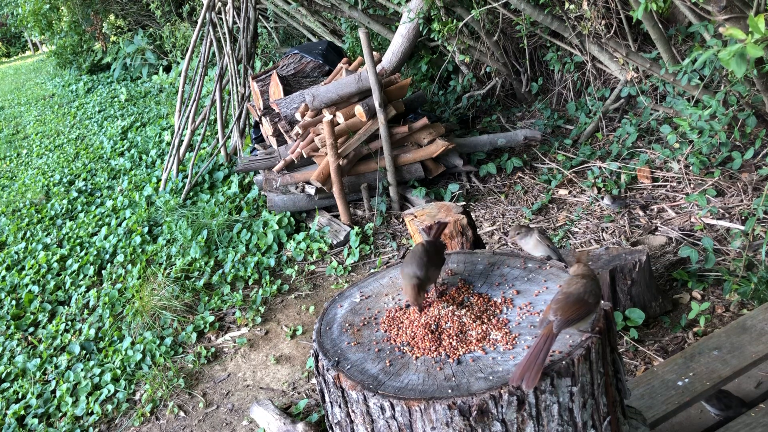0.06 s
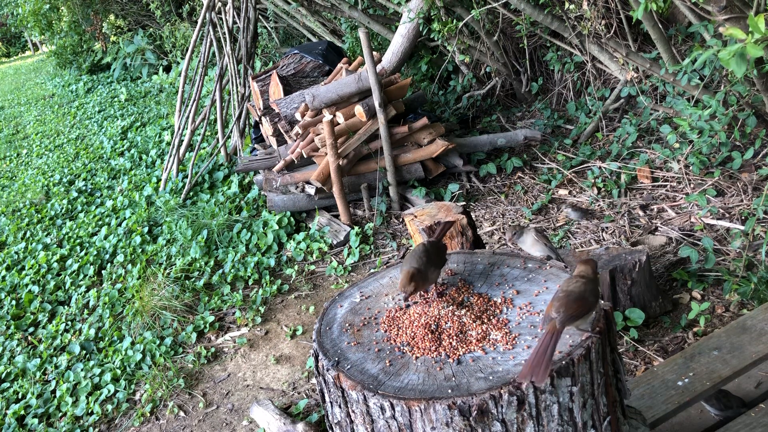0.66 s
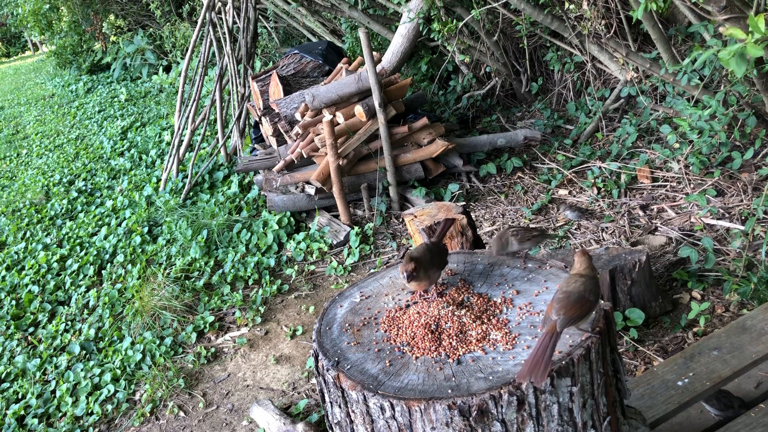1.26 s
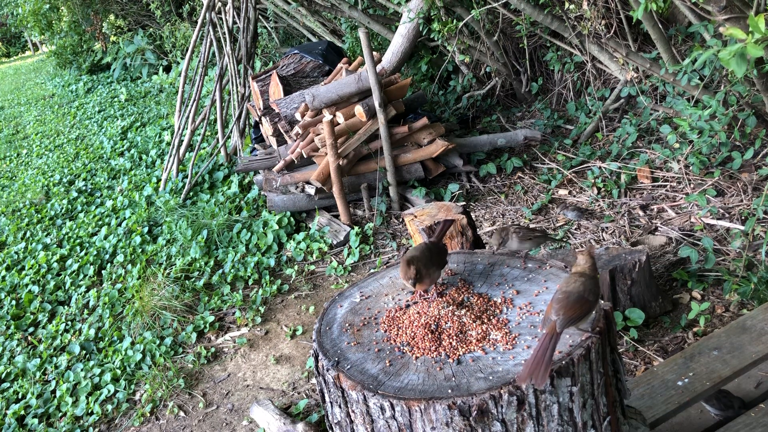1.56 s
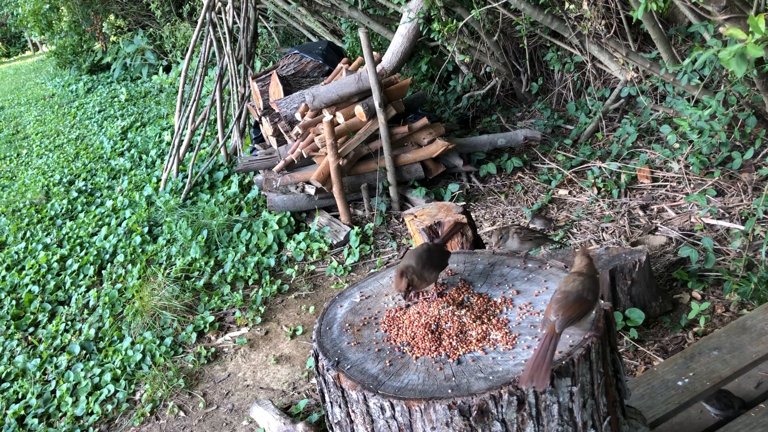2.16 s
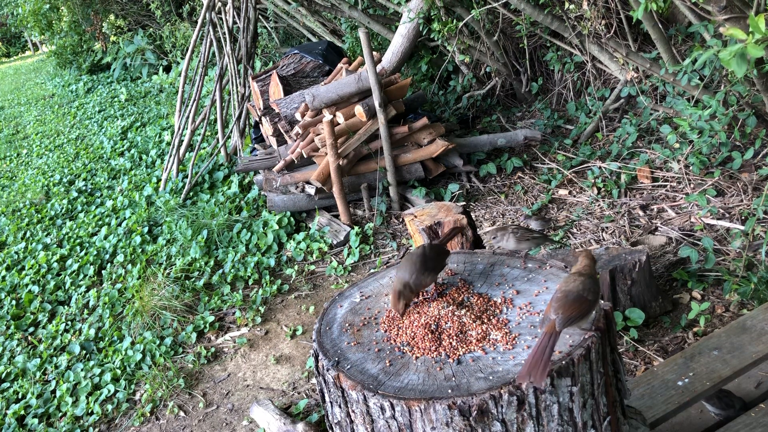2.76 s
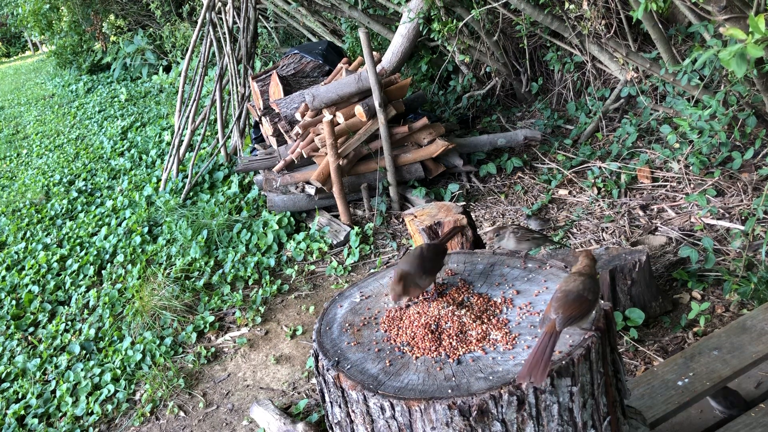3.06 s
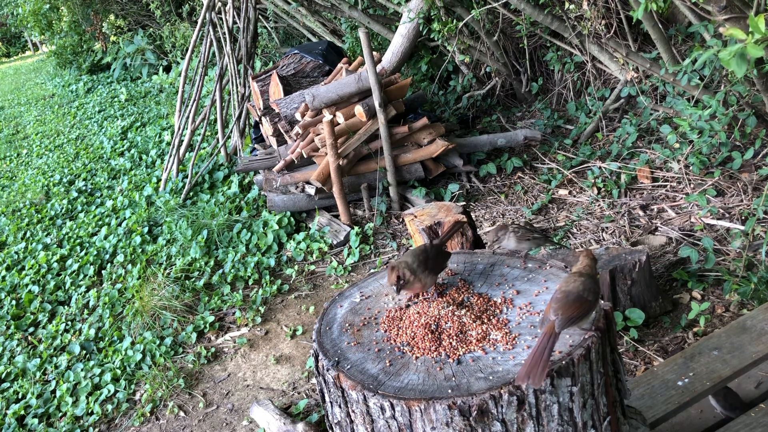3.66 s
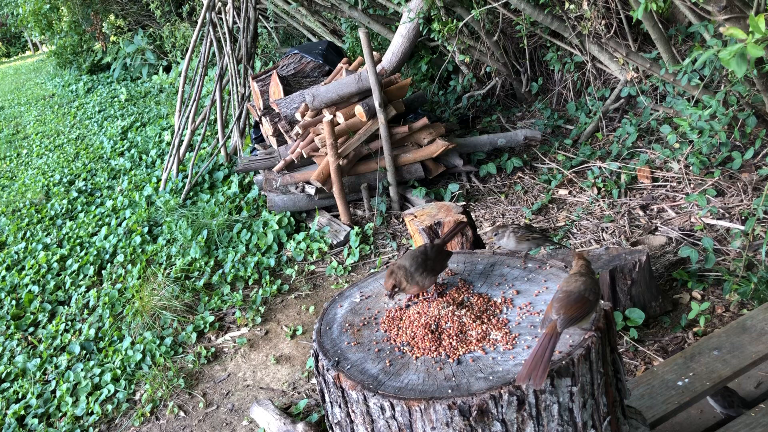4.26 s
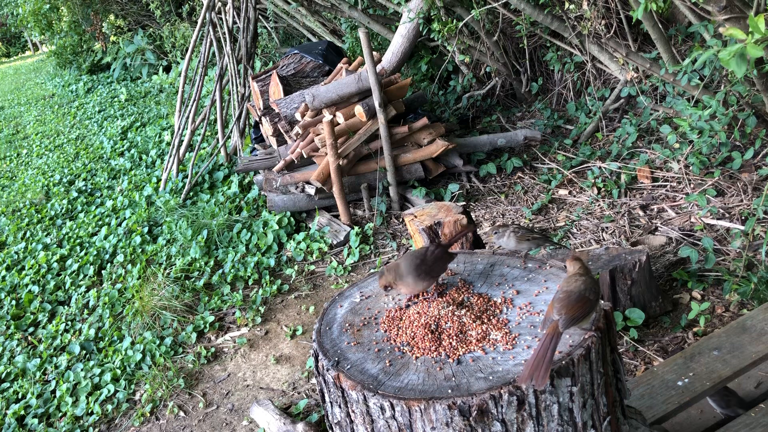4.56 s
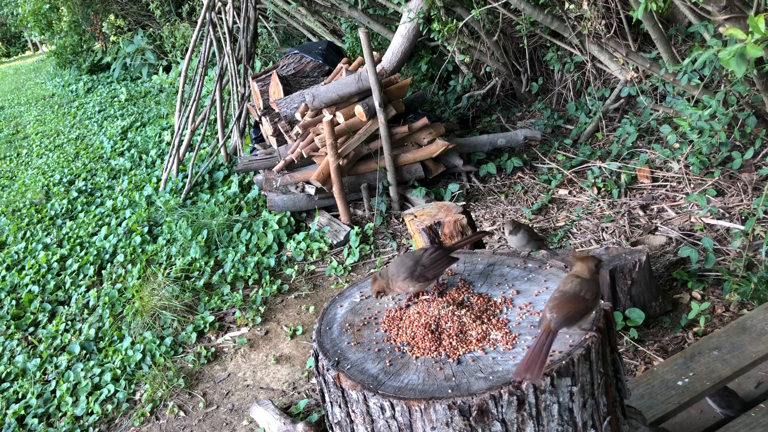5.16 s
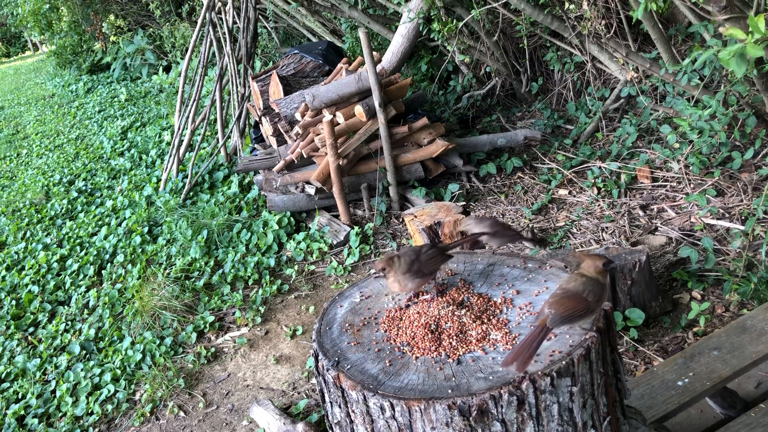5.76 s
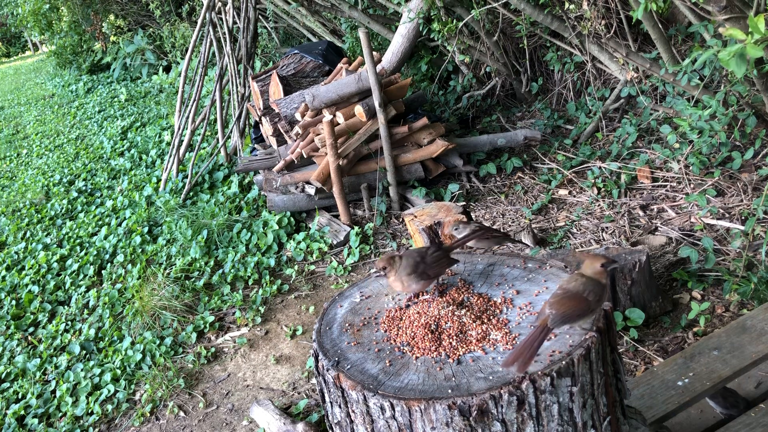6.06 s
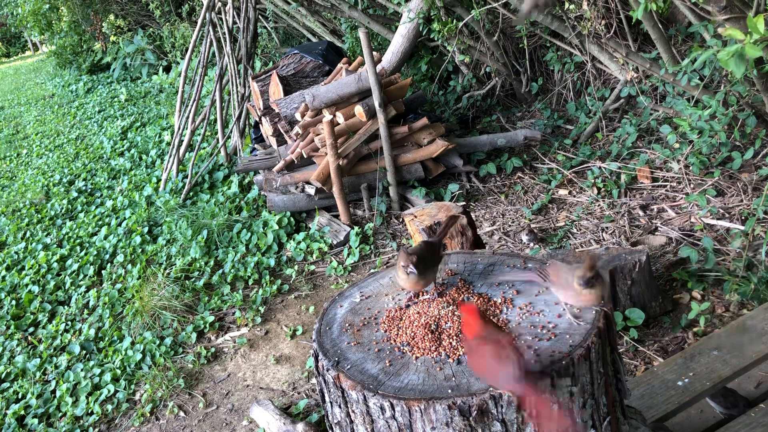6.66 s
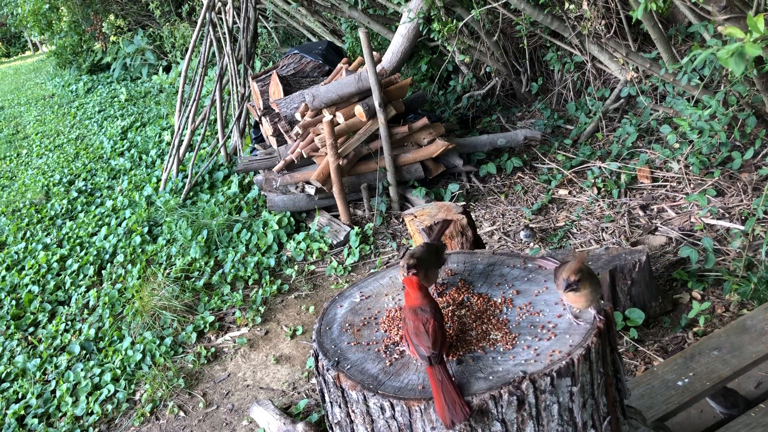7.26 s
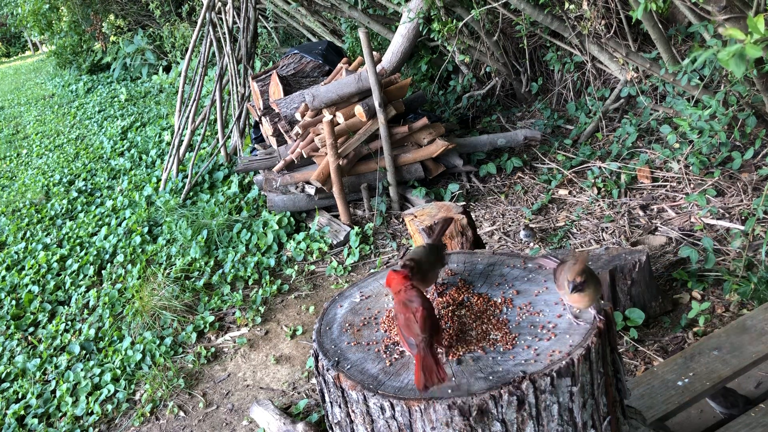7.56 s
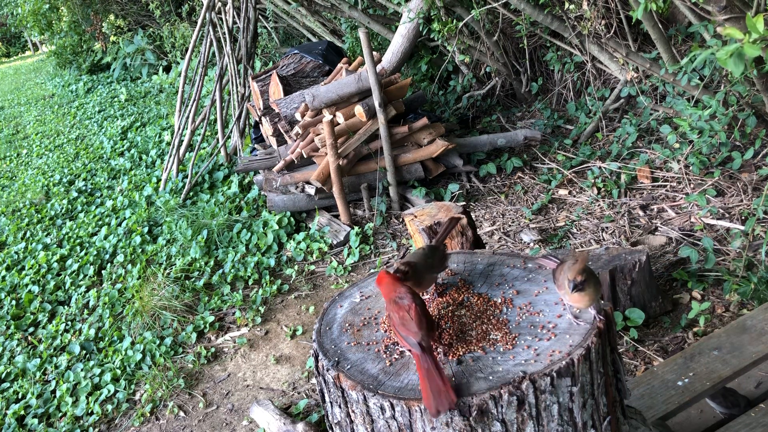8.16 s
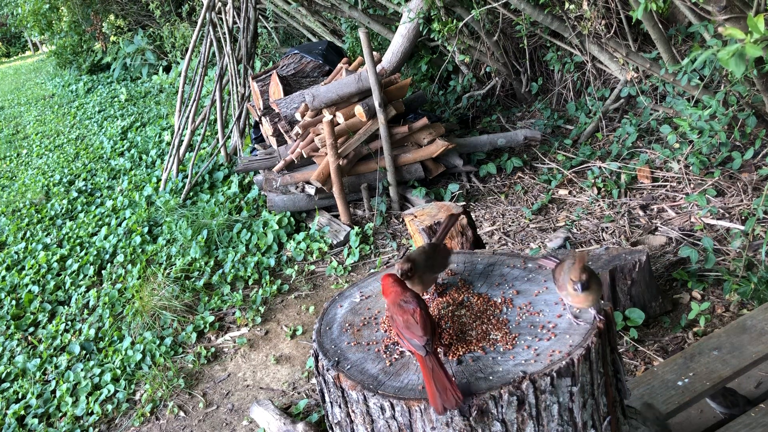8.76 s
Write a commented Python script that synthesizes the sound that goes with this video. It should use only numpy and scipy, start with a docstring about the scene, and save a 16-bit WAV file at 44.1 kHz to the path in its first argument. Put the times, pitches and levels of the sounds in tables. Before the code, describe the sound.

Short sharp bird chips and tiny seed cracks sound against steady crickets, a distant repeated whistle and a low traffic murmur.

```python
"""Crickets chirp and trill over a murmur of distant traffic, each wing stroke driving a wing resonance.
On a stump at the edge of a wood cardinals feed: seed husks fracture in short broadband cracks, and the
young beg with sharp chips in which the two sides of the syrinx modulate each other. A far bird repeats
its slurred whistle, scattered by the trees, and later on wings flutter in pulses of noise."""
import sys
import numpy as np
from scipy import signal
from scipy.fft import rfft, irfft, next_fast_len
from scipy.io import wavfile

SR = 44100
rng = np.random.default_rng(int(sys.argv[2]) if len(sys.argv) > 2 else 0)


def wrap_up_sound(samples):
    """Save the sound to the file named by the first command line argument, as 16-bit audio."""
    columns = np.atleast_2d(samples).T
    # keep every value between -1 and 1, then stretch to whole-number steps
    tamed = np.clip(columns, -1, 1)
    steps = np.round(tamed * 32767).astype(np.int16)
    wavfile.write(sys.argv[1], SR, steps)


N = 397341
TIME = np.arange(N) / SR


def amp(db):
    """Amplitude ratio of a level in decibels."""
    return 10 ** (np.asarray(db) / 20)


def unit(x):
    """Normalisation to rms 1."""
    return x / np.sqrt(np.mean(abs(x) ** 2) + 1e-20)


def read(points, hz):
    """Interpolation of a table on a logarithmic frequency axis."""
    f, value = np.transpose(points)
    return np.interp(np.log(hz + 1), np.log(f), value)


def add(mix, s, sound):
    """Superposition: a sound joins the mix at time s."""
    part = mix[max(round(s * SR), 0):][:len(sound)]
    part += sound[:len(part)]


def phasor(hz):
    """A unit oscillation whose phase is the integral of frequency."""
    return np.exp(2j * np.pi * np.cumsum(hz, axis=-1) / SR)


def shaped(x, points):
    """Zero-phase filtering by a table of f/Hz, gain/dB."""
    full = next_fast_len(len(x))
    return irfft(rfft(x, full) * amp(read(points, np.fft.rfftfreq(full, 1 / SR))), full)[:len(x)]


def coloured(points, size=N):
    """Filtered white noise of rms 1, its spectrum given as f/Hz, level/dB."""
    return unit(shaped(rng.standard_normal(size), points))


def wander(rate_hz, size=N):
    """Random modulation: straight lines join rate_hz Gaussian values a second."""
    at = np.arange(size) * rate_hz / SR
    knots = rng.standard_normal(int(size / 8) + 8)
    return np.interp(at, np.arange(len(knots)), knots)


def trees(x, build_s):
    """Scattering by trunks and leaves: sparse echoes build up, then decay at a rate set by frequency."""
    # reverberation time of the wood: f/Hz, T60/s
    decay_times = [(2000, 0.17), (4000, 0.33), (7500, 0.29), (15000, 0.2)]
    taps = rng.standard_normal(SR // 2) * (rng.random(SR // 2) < .1)
    hz, t, spectra = signal.stft(taps, SR, nperseg=256)
    decay = amp(-60 * t / read(decay_times, hz)[:, None])
    tail = signal.istft(spectra * decay * (1 - np.exp(-t / build_s)), SR, nperseg=256)[1]
    return signal.oaconvolve(x, tail / np.linalg.norm(tail))[:N]


def insect_chorus(level_db=-57.5):
    """Incoherent summation: many far insects blur into a band of noise."""
    # spectral density of the chorus: f/Hz, relative level/dB
    spectrum = [(5000, -20.5), (5800, -14.5), (6080, 2.5), (6300, -1), (6650, 1), (7000, 4), (7350, -4),
                (7650, -13.5), (8500, -24), (10000, -56)]
    return amp(level_db + 0.87 * wander(100)) * coloured(spectrum)


def traffic(gain_db=3):
    """Distant traffic and still air form broadband noise, strongest in the bass, that swells gently."""
    # spectral density of traffic and air: f/Hz, relative level/dB
    spectrum = [(20, -42), (40, -8.5), (70, 0.5), (150, -1), (230, -10), (360, -13.5), (520, -11.5),
                (750, -7.5), (1000, -7), (1500, -14.5), (2500, -28), (4500, -37), (9000, -43.5),
                (16000, -44.5)]
    # the slow swell: t/s, level/dB before gain_db
    swell = [(0.0, -51.5), (1.7, -52), (2.4, -52.5), (2.56, -51.5), (6.24, -53), (8.72, -52.5), (9.0, -51)]
    return amp(gain_db + np.interp(TIME, *np.transpose(swell))) * coloured(spectrum)


def machine_hum():
    """A far machine radiates a line spectrum, each partial wavering in level and frequency."""
    # partials of the hum: f/Hz, level/dB
    partials = [(72.6, -63), (146, -66.5), (178, -62.5), (238, -65.5), (296, -73)]
    return sum(amp(db + 3.2 * wander(4)) * phasor(hz + 3 * wander(12)).real for hz, db in partials)


def ground_cricket(hz=6935, pulse_hz=44.3, sag_hz=90, level_db=-60.5):
    """Continuous stridulation makes a trill; the frequency sags within each wing stroke."""
    stroke = np.cumsum(pulse_hz * (1 + 0.022 * wander(4.1))) / SR % 1
    song = np.sin(np.pi * stroke) ** 4 * phasor(hz + sag_hz * (.5 - stroke) + 35 * wander(200)).real
    return amp(level_db) * unit(song + amp(-4.5) * trees(song, build_s=.004))


def far_cricket(hz=6240, chirps_hz=2.7, level_db=-60):
    """A gated tone, slower in rhythm than the near cricket, arrives by scattering alone."""
    gate = np.clip(2 * phasor(chirps_hz * (1 + 0.04 * wander(1.62))).real + .5, 0, 1)
    return amp(level_db) * trees(gate * phasor(hz + 60 * wander(200)).real, build_s=.004)


def peeps():
    """A single voice of a cardinal's syrinx sweeps a thin pure tone linearly in frequency."""
    # the sweeps: start t/s, end t/s, first f/Hz, last f/Hz, level/dB
    notes = [(0.0, 0.021, 8360, 7770, -42), (7.533, 7.569, 8900, 10260, -35)]
    out = np.zeros(N)
    for start, end, first_hz, last_hz, db in notes:
        hz = np.linspace(first_hz, last_hz, int((end - start) * SR))
        add(out, start, amp(db) * phasor(hz).real * signal.windows.tukey(len(hz), .5))
    return out


def near_cricket(hz=6258, chirp_s=0.1686, pulse_hz=32.9, level_db=-50.5, octave_db=-33, count=26):
    """Driven resonance: each chirp is a run of strokes that ring the wing, with a faint octave."""
    first_s, period_s, slowing_s = .04, .3295, .00134  # the period grows from chirp to chirp
    spread_db, stray_s = 0.76, 0.0026
    envelope, t = np.zeros(N), np.arange(0, chirp_s, 1 / SR)
    strokes = np.sqrt(abs(np.sin(np.pi * pulse_hz * t))) * signal.windows.tukey(len(t), .12)
    for k, (late, strong) in enumerate(rng.standard_normal((count, 2))):
        start = first_s + k * (period_s + k * slowing_s / 2)
        add(envelope, start + stray_s * late, amp(level_db + spread_db * strong) * strokes)
    wing = phasor(hz + 58 * wander(450))
    song = envelope * amp(2 * wander(220)) * (wing + amp(octave_db) * wing ** 2).real
    return song + amp(-2) * trees(song, build_s=0.0045)


def nibbles(per_s=12, level_db=-67, spread_db=3.0, decay_s=0.0027):
    """A Poisson process of tiny impacts: beaks and shifting seed tick as damped bursts of noise."""
    impacts = (rng.random(N) < per_s / SR) * amp(spread_db * np.minimum(rng.exponential(1, N), 3))
    t = np.arange(512) / SR
    tick = coloured([(2000, -4), (6000, 5), (11000, 0), (16000, -11)], size=512) * np.exp(-t / decay_s)
    return amp(level_db) * signal.oaconvolve(impacts, tick)[:N]


def seed_cracks(snap_s=0.0016, crumble_s=0.024, crumble_db=-18, width_hz=5000, husk_db=-12.0):
    """Brittle fracture: a husk snaps, then crumbles briefly, exciting one broad, bright resonance."""
    # the loudest fractures: t/s, peak level/dB, resonance f/Hz
    cracks = [(0.2534, -38, 14400), (0.9308, -31.5, 11800), (1.0266, -47, 11400), (1.0672, -35, 9600),
              (2.5331, -49, 14500), (2.6302, -35.5, 14300), (2.9337, -43, 12300), (3.1238, -41.5, 11800),
              (3.2884, -46, 10600), (4.8504, -44, 9520), (6.6897, -46, 11100), (6.9054, -45, 10500),
              (7.4885, -27, 13200), (8.4178, -49, 10700)]
    out, t = np.zeros(N), np.arange(2048) / SR
    hz = np.fft.rfftfreq(len(t), 1 / SR)
    for s, db, ring_hz in cracks:
        envelope = np.exp(-t / snap_s) + amp(crumble_db) * np.exp(-t / crumble_s)
        burst = rng.standard_normal(len(t)) * envelope
        ring = irfft(rfft(burst) * hz * width_hz / (hz * width_hz + 1j * (hz ** 2 - ring_hz ** 2)))
        crack = ring + amp(husk_db) * shaped(burst, [(700, -11), (2500, 2.0), (7000, 2), (12000, -8)])
        add(out, s + 0.0004, amp(db) * crack / abs(crack).max())
    return out


def slur(shape, burr_hz=1300, octave_db=-17):
    """Random frequency modulation makes a gliding whistle hoarse. Returns onset and sound."""
    s, *columns = np.transpose(shape)
    t = np.arange(s[0], s[-1], 1 / SR)
    hz, db, hoarse = (np.interp(t, s, column) for column in columns)
    tone = phasor(hz + burr_hz * hoarse * wander(2500, size=16384)[:len(t)])
    return s[0], (tone + amp(octave_db) * tone ** 2).real * amp(db) * signal.windows.tukey(len(t), .1)


def far_birds():
    """Whistles from inside the wood arrive both by the direct path and by scattering."""
    # repeats of the call: t/s, level/dB
    calls = [(0.472, -40.5), (1.665, -43), (3.011, -41.5), (4.628, -50), (6.72, -41.5)]
    # its hoarse opening and two syllables: relative t/s, f/Hz, relative level/dB, hoarseness (0-1)
    contour = [(-.04, 5200, -26, 1), (-.012, 5170, -6, 0.82), (.002, 4300, -5.5, 0.86),
               (.018, 4630, -3.5, 0.26), (.042, 4400, -2, 0.22), (.049, 2942, -5, 0.27),
               (.058, 3605, 2, .22), (.075, 3800, -6.5, 0.17), (.09, 3420, -9, 0.3)]
    # one fainter warble: t/s, f/Hz, level/dB, hoarseness (0-1)
    warble = [(3.455, 3600, -61, 1), (3.485, 4050, -54, .5), (3.505, 3100, -57, 0.3),
              (3.53, 2450, -61, 0.13), (3.545, 3000, -77, .3), (3.565, 3770, -65, 0.31),
              (3.6, 3000, -55, 0.51), (3.635, 2320, -61, 0.17)]
    out = np.zeros(N)
    for s, db in calls:
        lead, call = slur(contour)
        add(out, s + lead, amp(db) * call)
    add(out, *slur(warble))
    return out + amp(-3.5) * trees(out, build_s=0.0013)


def chip(row, scoop_s=0.0069, sag_hz=89.4, fall_s=0.018, attack_s=0.0062, fade_db=28.5):
    """Coupled oscillators: both sides of the syrinx arch up and snap down, modulating each other."""
    start, end, crest_hz, climb_hz, scoop_hz, gap_hz, low_db, high_db, swell_db, rasp = row
    coupling_db, sum_tone_db, hiss_db = -24.5 + 10.5 * rasp, -0.5 - 4 * rasp, -30 + 12.5 * rasp
    waver_hz, jitter_hz, tremble_db = 30, 45.4 + 29 * rasp, 2 * rasp
    # a chip pushed harder is brighter and falls further
    effort_db = low_db + 28  # above an ordinary chip
    overtone_db = -26.5 + 11.5 * rasp + 0.71 * effort_db + 0.0078 * climb_hz
    fall_hz = 2270 + 60 * effort_db + 900 * rasp
    t = np.arange(0, end - start, 1 / SR)
    flutter, fray, shimmer, waver, *jitter = (
        wander(rate_hz, size=8192)[:len(t)] for rate_hz in (2410, 2270, 242, 134, 904, 880))
    to_crest = np.clip(1 - t / (end - start - fall_s), 0, 1)
    closing = np.clip((t - t[-1]) / fall_s + 1, 0, 1) ** 2
    arch_hz = crest_hz - climb_hz * to_crest ** 1.5 - sag_hz * np.sin(np.pi * to_crest) ** 2
    low_hz = arch_hz - scoop_hz * np.exp(-t / scoop_s) - fall_hz * closing + waver_hz * waver
    low, high = phasor(np.array([low_hz, low_hz + gap_hz]) + jitter_hz * np.array(jitter))
    # the beat throws sidebands one gap above and below the voices
    beat = np.exp(2 * amp(coupling_db) * (high / low).real)
    voice = (amp(low_db) * low + amp(high_db) * high) * beat
    octaves = amp(low_db) * low ** 2 + amp(high_db) * high ** 2
    sum_tone = amp(sum_tone_db + max(low_db, high_db)) * low * high
    overtones = amp(overtone_db) * (octaves + sum_tone) * beat * np.exp(.3j * fray)
    # turbulent air roughens the tone and hisses along with it
    turbulence = amp(hiss_db) * (.8 * flutter * voice.real + .6 * abs(voice) * rng.standard_normal(len(t)))
    edges = np.clip(t / attack_s, 0, 1) * np.clip((t[-1] - t) / 0.0022, 0, 1)
    level_db = tremble_db * shimmer - swell_db * to_crest ** 2 - fade_db * closing
    return start, ((voice + overtones).real + turbulence) * edges * amp(level_db)


def begging_cardinals():
    """Source and filter: chips from the syrinx are coloured by the throat and open beak."""
    # chips at the syrinx: start t/s, end t/s, lower voice's crest f/Hz, climb f/Hz, opening scoop f/Hz,
    # gap to the upper voice f/Hz, lower level/dB, upper level/dB, swell to the crest/dB, rasp (0-1)
    chips = [(0.49, 0.567, 6680, 637, 58, 935, -37.5, -29.5, 16, 0.14),
             (1.129, 1.206, 7130, 796, 470, 980, -29, -36.5, 5.5, .5),
             (2.103, 2.181, 7190, 1323, 250, 740, -21.5, -19, 12, 0.12),
             (2.214, 2.268, 6920, 180, 1320, 1110, -36, -38, -3, 0.6),
             (2.299, 2.375, 7110, 1110, 450, 810, -23.5, -20.5, 12.5, 0),
             (3.503, 3.588, 7210, 1355, 1640, 400, -23, -21, 20.5, .2),
             (3.651, 3.712, 6720, -500, 2000, 1200, -43.5, -42, 5, 0.57),
             (4.097, 4.181, 7180, 1303, 1380, 780, -25, -23.5, 13, 0.52),
             (5.067, 5.125, 6580, 662, 100, 910, -35.5, -28, 9, 0.26),
             (5.157, 5.209, 6700, 502, 460, 880, -36.5, -32, -3, 0),
             (5.256, 5.321, 6690, -100, 1174, 804, -35.5, -30.5, 6, 0.2),
             (6.126, 6.203, 6760, 1052, 290, 1340, -24, -34, 23, 0),
             (6.179, 6.224, 6660, 237, 0, 964, -29.5, -24.5, -3, 0.3),
             (6.256, 6.324, 6600, 200, 488, 1154, -23.5, -25.5, 1.5, 0.52),
             (6.364, 6.433, 6680, 293, 892, 1020, -29, -20.5, 17.5, 0.47),
             (6.445, 6.514, 6640, 235, 1428, 1310, -25.5, -36, 23, 0.6),
             (6.997, 7.063, 6950, 464, 0, 1147, -34, -27.5, 7.5, 1),
             (7.128, 7.194, 6790, 662, 72, 1174, -30, -24, 8.5, 0.83),
             (7.555, 7.63, 7030, 416, 0, 1030, -35.5, -29.5, 8.5, 1),
             (7.652, 7.737, 6610, -100, 340, 1040, -34, -32, -2.5, 1),
             (7.722, 7.8, 6420, 500, 2, 1237, -35, -27.5, 9, 0.72),
             (7.855, 7.935, 6700, 277, 1398, 987, -36.5, -33.5, 5, 1),
             (8.038, 8.116, 6840, 1021, 416, 1000, -37.5, -35.5, 12, 1),
             (8.639, 8.701, 6900, 202, 890, 860, -31, -25, 25, 0),
             (8.735, 8.784, 6720, -250, 670, 854, -37, -30.5, -6.5, 0.16)]
    # response of throat and beak: f/Hz, gain/dB
    beak = [(1500, -50), (3500, -10), (5200, 5), (6300, 2), (8100, 0.5), (9300, 0.5), (11000, 4.5),
            (13000, -0.5), (15000, 1.5)]
    source = np.zeros(N)
    for row in chips:
        add(source, *chip(row))
    return shaped(source, beak)


def wings(beat_hz=21):
    """Amplitude-modulated noise: feathers swish once in every wing beat."""
    # bursts of wing beats: start t/s, end t/s, level/dB
    flutters = [(5.845, 6.038, -66.5), (6.116, 6.488, -62), (6.62, 6.952, -64)]
    envelope = np.zeros(N)
    for start, end, db in flutters:
        t = np.arange(0, end - start, 1 / SR)
        beats = 0.77 + np.sin(np.pi * beat_hz * t) ** 4
        add(envelope, start, amp(db) * signal.windows.tukey(len(t), .6) * beats)
    envelope *= amp(2.0 * wander(300))
    return envelope * coloured([(600, -12), (2500, 4.0), (5500, 2), (10000, 1), (15000, 1)])


def bounce(x, delay_s=0.0019, echo_db=-21):
    """Early reflection: the stump's top and the ground return one quick echo."""
    return x + amp(echo_db) * np.interp(TIME - delay_s, TIME, x)


def scene():
    """Direct sound dominates at the nearby stump; the other sources lie farther back."""
    near = bounce(begging_cardinals() + peeps() + seed_cracks() + nibbles() + wings())
    scatter = amp(-20) * trees(near, build_s=.004)
    singers = far_birds() + near_cricket() + far_cricket() + ground_cricket()
    background = insect_chorus() + traffic() + machine_hum()
    return (near + scatter + singers + background)[None]


def record(dry):
    """Band limiting: a linear-phase low-pass filter removes the highest treble."""
    cutoff_hz = 15900
    lowpass = signal.firwin(511, cutoff_hz, window=("kaiser", 9), fs=SR)
    return signal.oaconvolve(dry, lowpass[None], "same")


dry = scene()
out = record(dry)
wrap_up_sound(out)
```